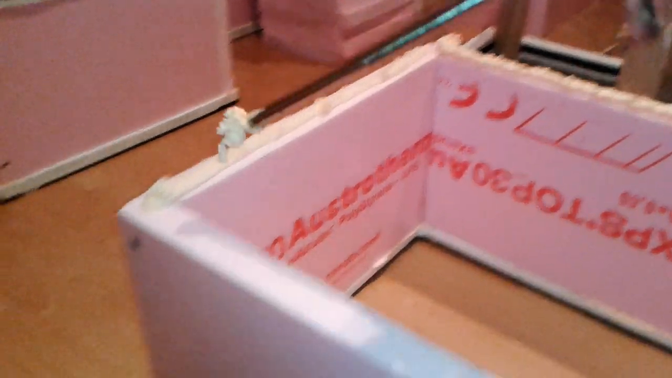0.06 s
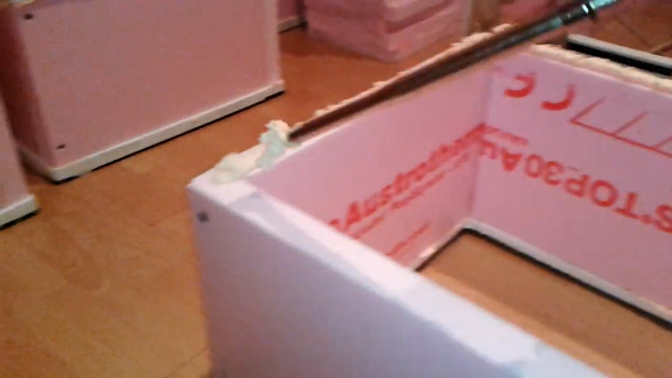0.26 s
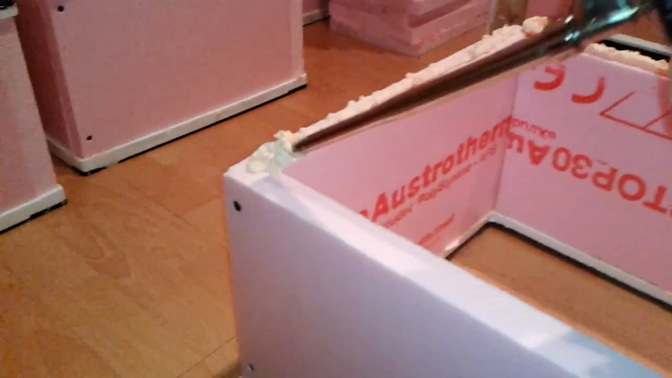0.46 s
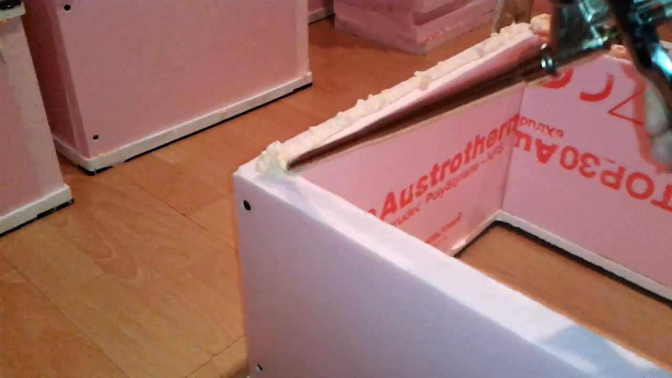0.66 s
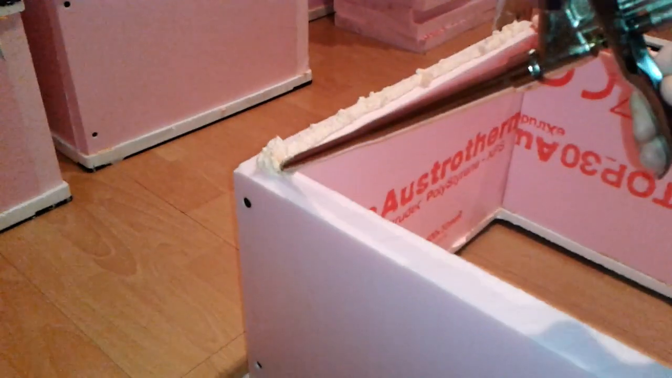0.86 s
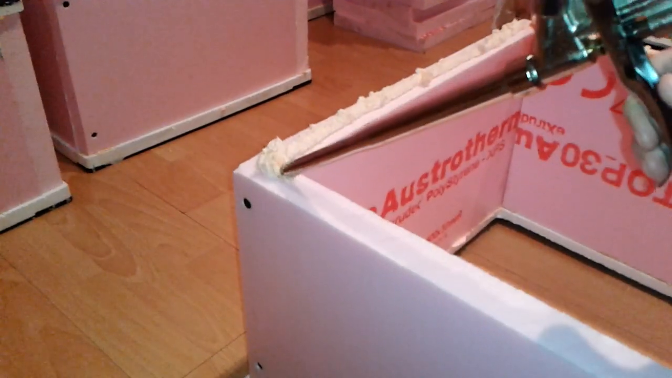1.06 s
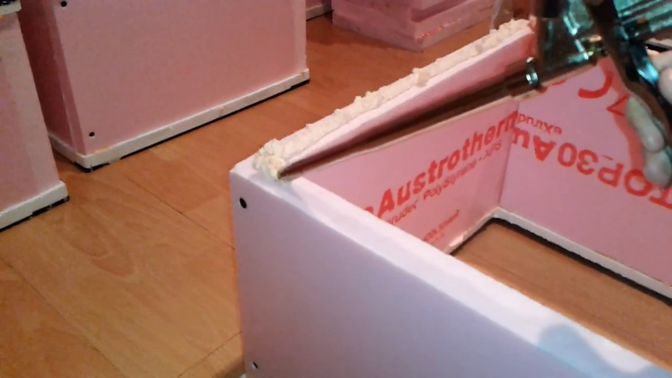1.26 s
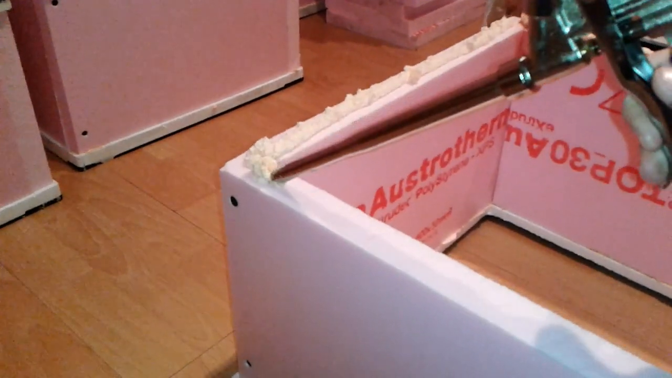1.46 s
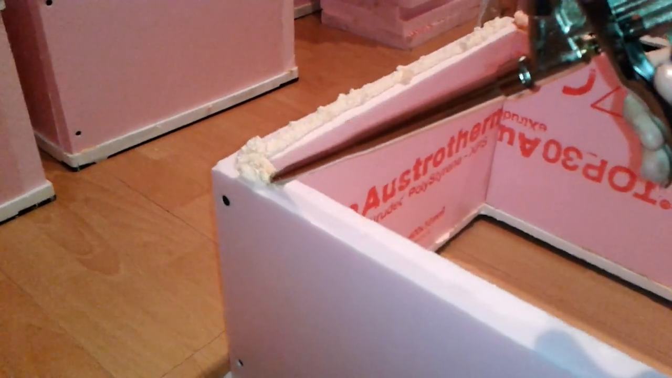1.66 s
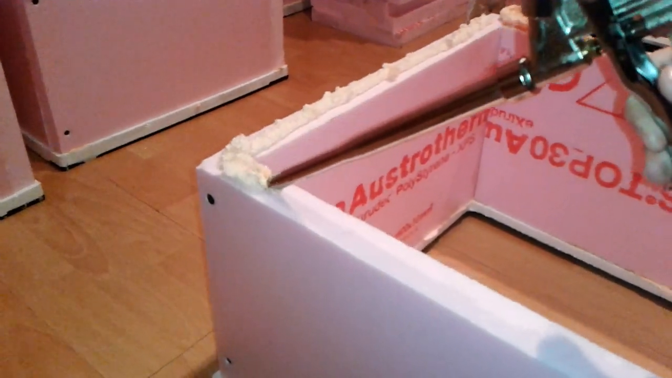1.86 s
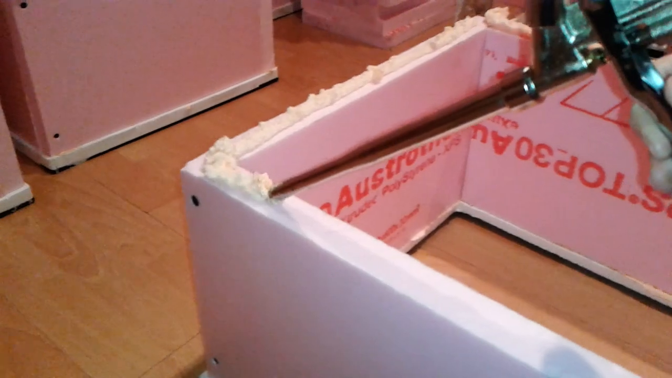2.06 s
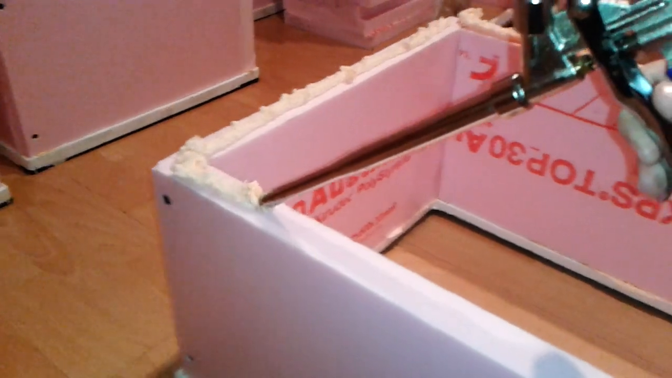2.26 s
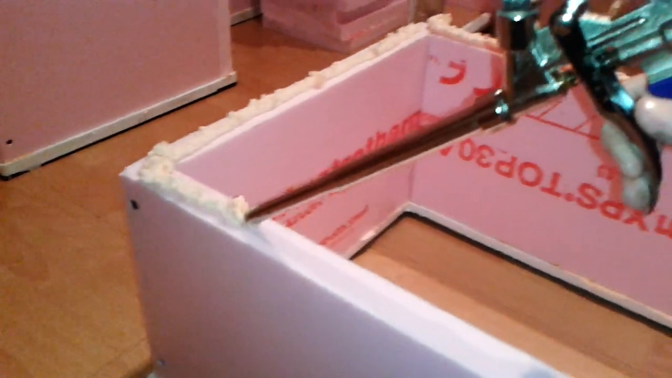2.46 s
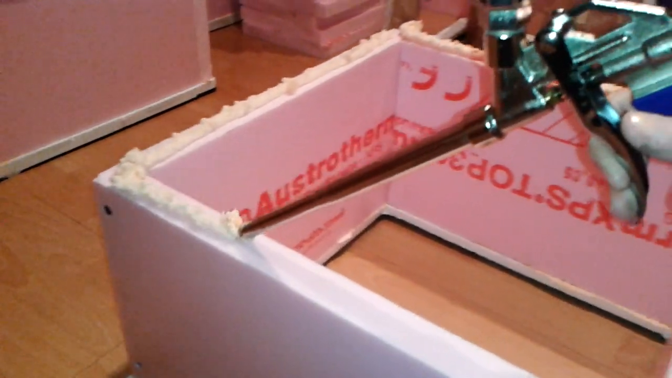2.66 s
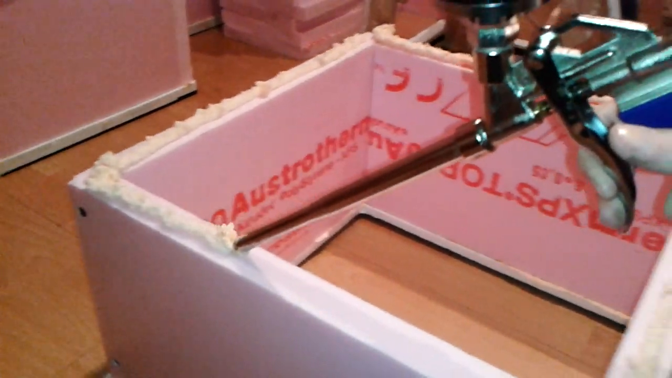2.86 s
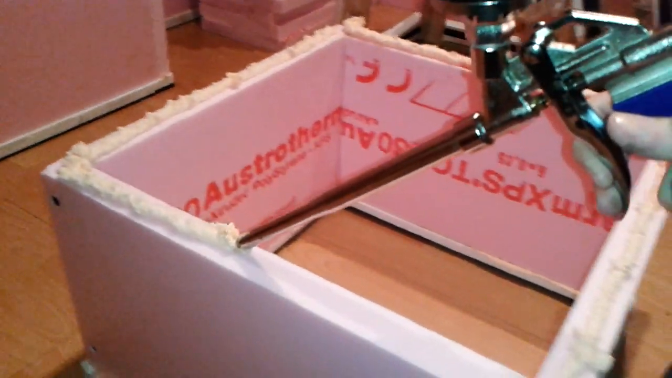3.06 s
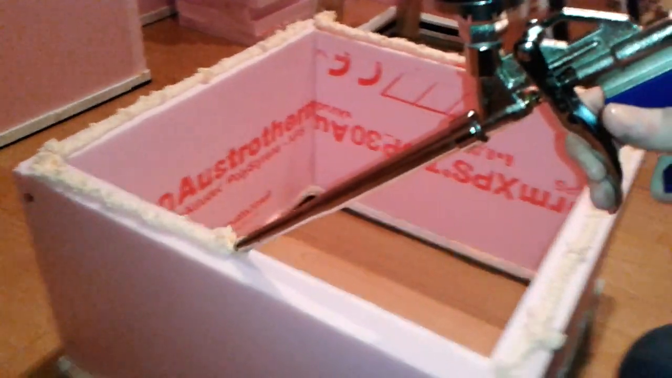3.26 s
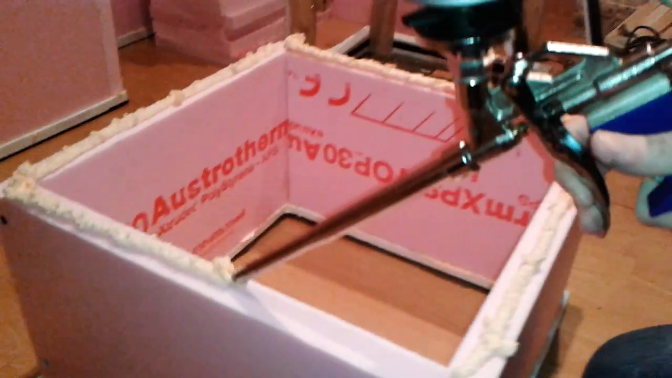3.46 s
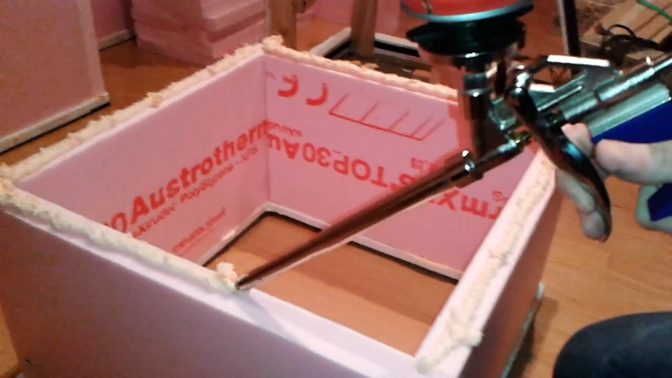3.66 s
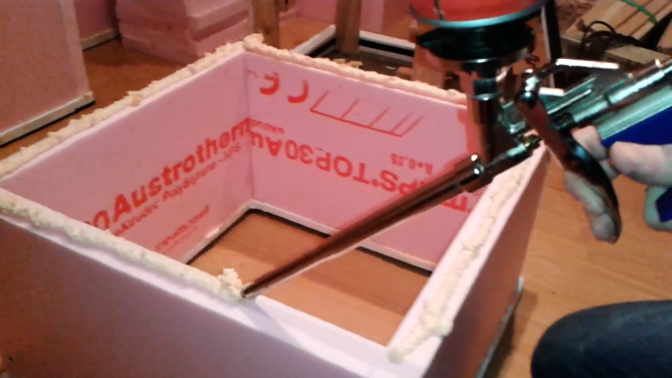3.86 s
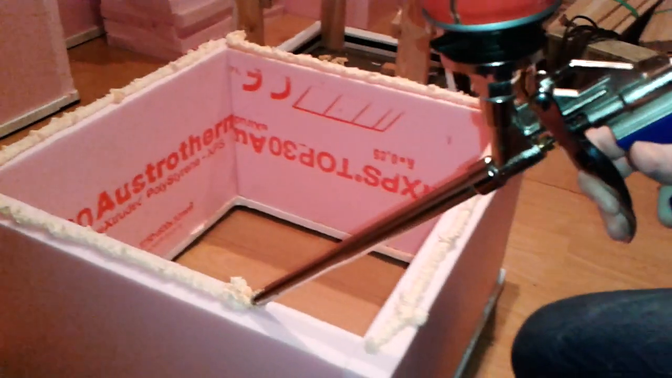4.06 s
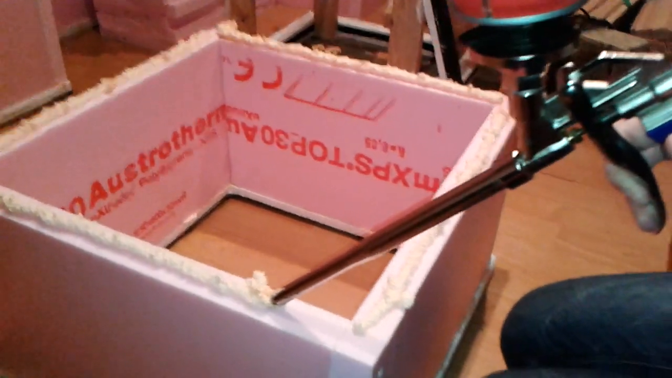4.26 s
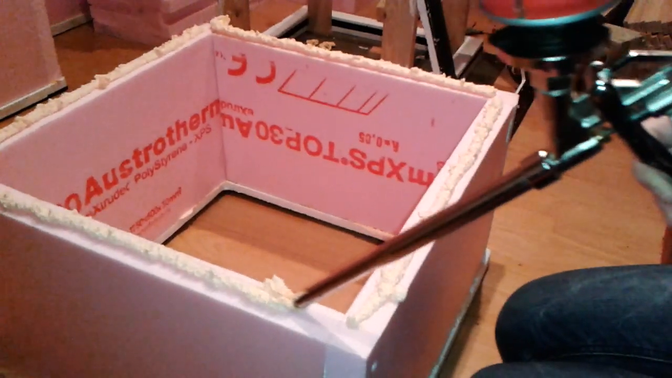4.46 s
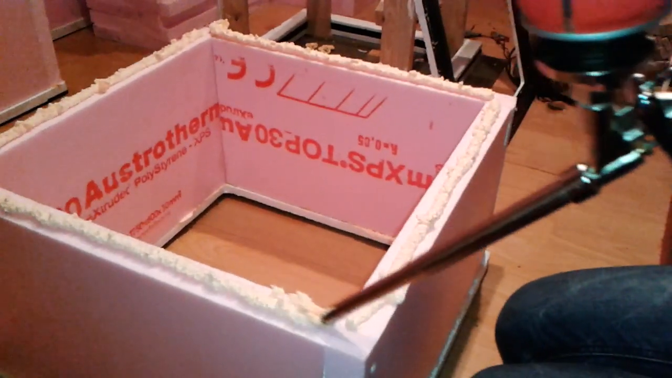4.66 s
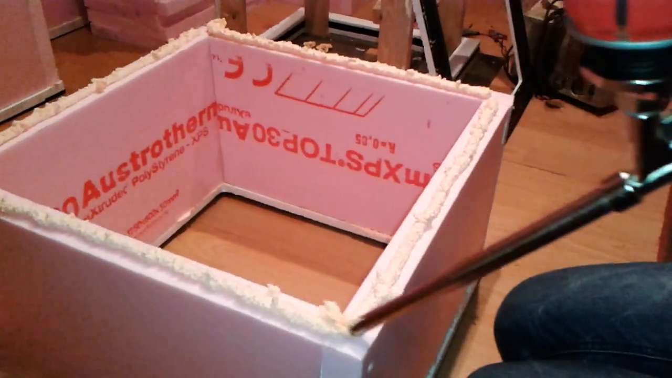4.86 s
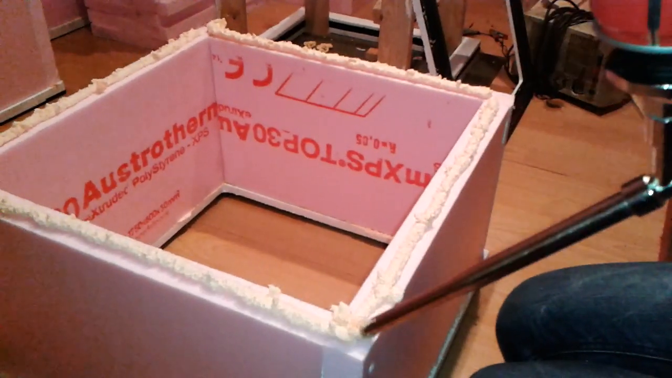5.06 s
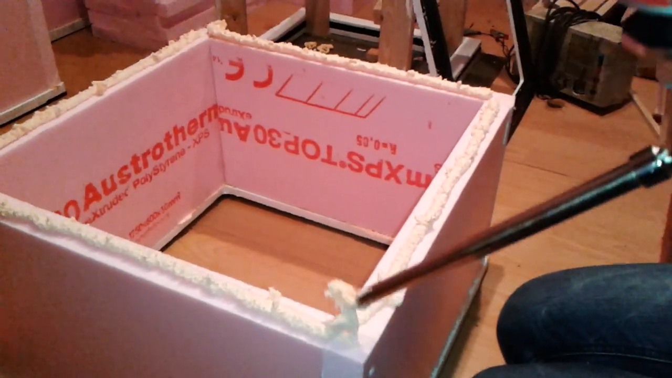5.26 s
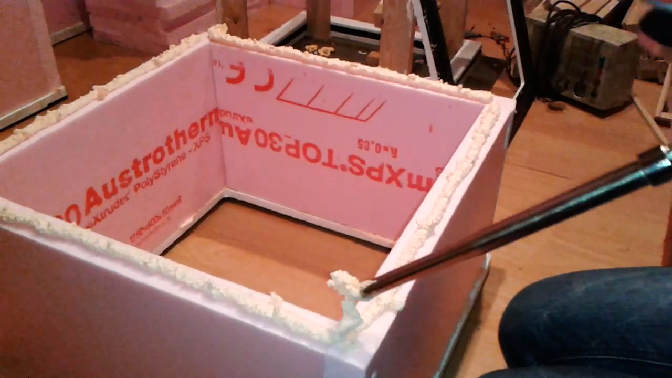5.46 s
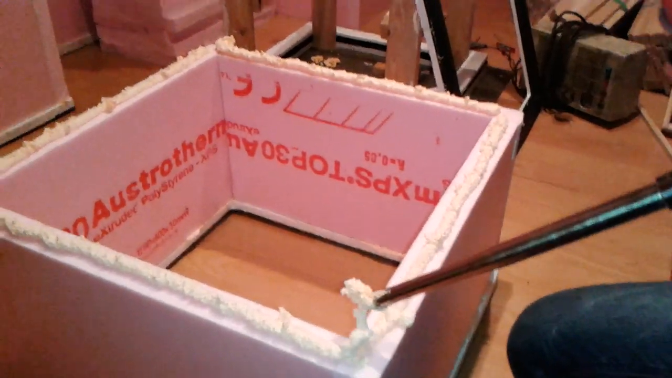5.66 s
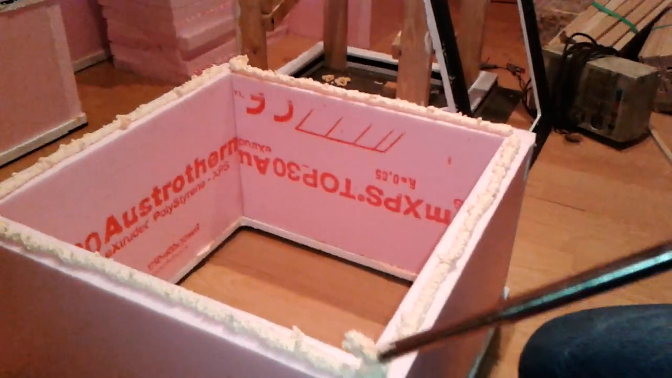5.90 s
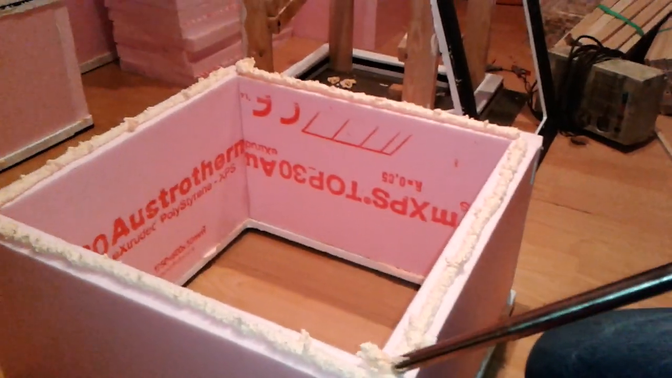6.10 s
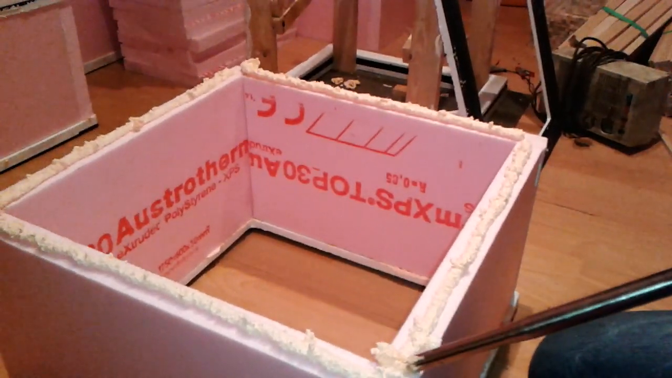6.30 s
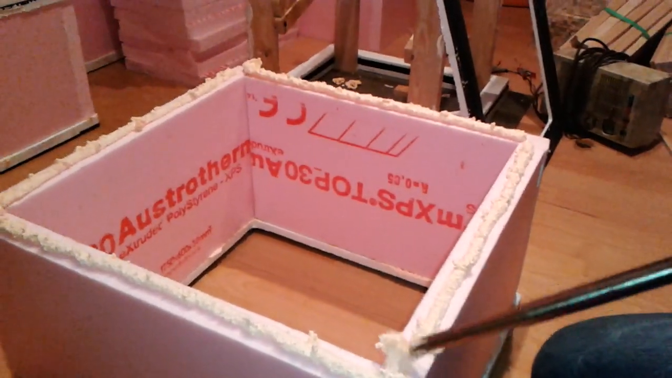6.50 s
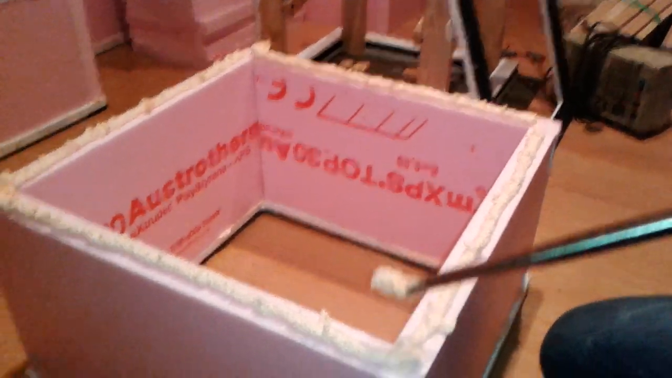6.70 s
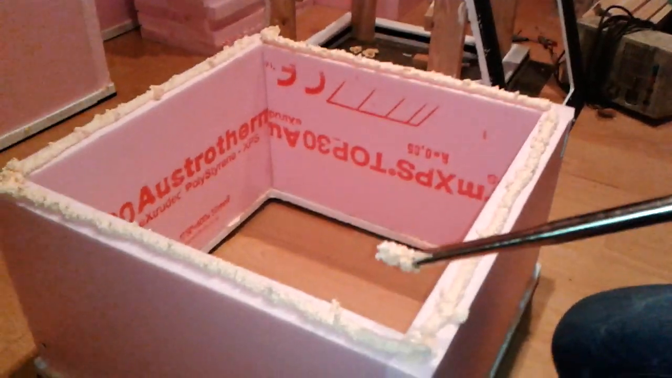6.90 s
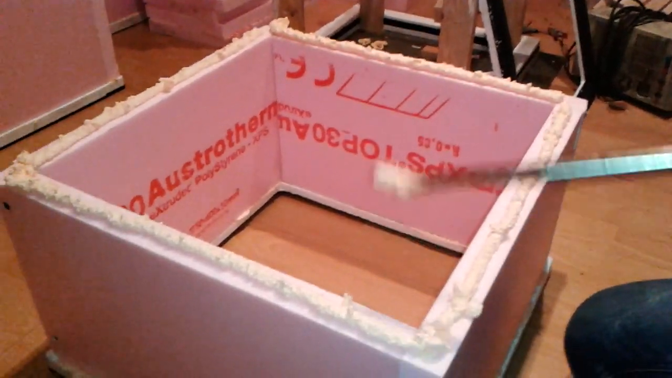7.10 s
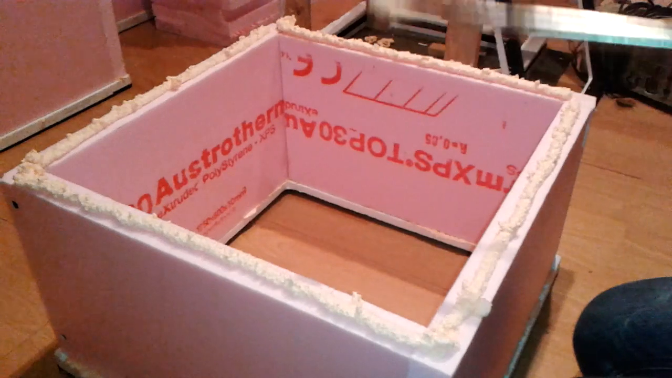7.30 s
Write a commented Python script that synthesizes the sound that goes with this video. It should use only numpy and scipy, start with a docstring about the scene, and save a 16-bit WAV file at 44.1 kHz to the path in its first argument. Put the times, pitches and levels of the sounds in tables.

```python
"""Foam gun in an open foam-board box

Foam adhesive sputters from a hand gun's long nozzle along the box edge: popping, stuttering gas noise
with quick spurts, and a few early pops. Box and floor return drifting echoes and a short tail.
The small recorder is hand-held: skin rustles, ticks ring its case, and a deep rumble comes as it sways.
Beneath lie a steady hiss and a thin, wavering whine that swells with the sound."""
import sys
import numpy as np
from scipy import signal
from scipy.fft import rfft, irfft
from scipy.io import wavfile
from scipy.ndimage import uniform_filter1d

SR = 44100
rng = np.random.default_rng(int(sys.argv[2]) if len(sys.argv) > 2 else 0)


def inscribe(sig):
    """Save sig as 16-bit PCM at rate SR to the path in sys.argv[1].

    A 1-D sig is mono; a 2-D sig holds one channel per row.
    Samples are clipped to [-1, 1] before scaling.
    """
    pcm = np.round(np.clip(np.atleast_2d(sig).T, -1, 1) * 32767)
    wavfile.write(sys.argv[1], SR, pcm.astype(np.int16))


N = 323694
T = np.arange(N) / SR  # seconds

# Skin rustling on the recorder: time_s, level_db
RUSTLE_LEVEL = [(0.0, -60), (0.14, -56.5), (0.31, -62), (0.6, -66), (1.2, -63.5), (5.27, -61),
                (5.48, -61.5), (5.72, -58.5), (5.98, -64.5), (6.3, -66.5), (6.52, -65.5), (6.63, -57.5),
                (6.74, -60.5), (7.34, -60.5)]
# Spectrum of the rustle: frequency_hz, relative_level_db
RUSTLE_SPECTRUM = [(15, -32), (25, -8.5), (344, -2.5), (560, -10.5), (695, -8), (775, -10.5), (936, -10),
                   (6050, -22.5), (14800, -18), (16000, -14.5)]
# Spectrum of the recorder's hiss: frequency_hz, relative_level_db
HISS_SPECTRUM = [(12, -49), (20, 3), (55, -19), (79, -17), (210, 5.5), (301, 1.5), (328, -4.5), (434, -0.5),
                 (558, -3), (642, -11.5), (1400, -13.5), (5380, -17), (8650, -25), (14700, -25),
                 (16000, -11)]
# Ticks of the hand on the case: start_s, peak_db, centre_hz, thump_db (re peak, before its rise)
TICKS = [(0.099, -41, 910, -10), (0.108, -44.5, 657, -16), (0.159, -46, 1300, -12), (0.178, -31, 1230, -7),
         (0.195, -45, 3050, -7), (0.23, -52, 1300, -13), (1.7675, -34.5, 506, -22), (2.763, -27, 590, -19),
         (3.051, -33.5, 346, -16), (3.588, -33, 453, -12), (3.628, -32.5, 520, -20), (4.213, -43, 420, 4),
         (4.291, -43, 350, -7), (5.38, -48.5, 905, -17), (5.4358, -32.5, 1230, -8), (5.582, -48, 800, -16),
         (5.7017, -22, 896, -8.5), (5.7016, -38, 2200, -22), (5.7052, -35, 1010, -19),
         (5.734, -36.5, 590, 1), (5.7472, -42, 406, -6), (5.769, -39.5, 900, 1), (5.793, -45, 800, 0),
         (6.575, -52, 726, 6), (6.5972, -41, 500, 1), (6.6085, -43, 3300, -14), (6.616, -49, 1500, -14),
         (6.6241, -37.5, 1200, -8), (6.6271, -37, 1100, -3), (6.645, -42, 493, -9),
         (6.661, -48.5, 895, -18), (6.677, -49, 900, 2), (6.829, -49, 1000, -20), (6.833, -41.5, 830, -22),
         (6.89, -50, 1400, -13), (6.9728, -33.5, 1080, -26), (6.973, -37, 320, -24),
         (7.014, -44, 1250, -13), (7.064, -52, 1300, -13), (7.091, -36.5, 1100, -12), (7.091, -49, 260, -8),
         (7.118, -50, 397, -17), (7.227, -51, 900, -13), (7.297, -48.5, 387, 1)]
# Ringing modes of the case: pitch_hz, relative_level_db, t60_s
CASE_MODES = [(251, 3.5, 0.014), (437, 4.5, 0.011), (690, 7.5, 0.01), (917, 13.5, 0.0073),
              (1230, 12.5, 0.0045), (2300, 11, 0.0063), (2860, 9, 0.0064), (3700, 2, 0.0042)]
# The trigger opens, holds and closes: time_s, jet_level_db, brightness_db_per_octave
FLOW = [(1.2, -76, -6), (1.25, -68.5, 4), (1.33, -51.5, 3.5), (1.37, -44.5, -3.5), (1.47, -43, 2),
        (1.57, -40.5, -1.5), (1.66, -42, -2.5), (1.9, -40.5, -0.5), (2.3, -38.5, 0), (3.0, -36.5, -3),
        (3.9, -36.5, -1.5), (4.5, -37.5, -2), (4.97, -38.5, -3), (5.05, -44.5, -3), (5.11, -52, 0),
        (5.14, -50, -1.5), (5.18, -46.5, 1), (5.2, -60, 1), (5.25, -68, -5)]
# Strongest spurts at the tip: start_s, level_db, added_brightness_db_per_octave, length_s
SPURTS = [(1.336, -46, -6, 0.006), (1.348, -34, -7, 0.004), (1.365, -39, 2, 0.008),
          (1.377, -34.5, -1, 0.016), (1.41, -35.5, -4, 0.008), (1.432, -33, -4, 0.0061),
          (1.455, -32, -3, 0.0057), (1.468, -33, -5, 0.0068), (1.499, -32.5, -4, 0.014),
          (1.5177, -28.5, -5, 0.008), (1.534, -28, -7, 0.0073), (1.553, -29, -7, 0.0051),
          (1.566, -32, 3.5, 0.0095), (1.582, -33.2, -1, 0.034), (1.641, -31, 6, 0.0047),
          (1.692, -34, 1, 0.015), (1.729, -33, -1.0, 0.008), (1.7446, -31.5, -2, 0.012),
          (1.756, -38, 2, 0.014), (1.799, -33.5, 2.5, 0.0089), (1.883, -35, 1, 0.0072),
          (1.9436, -30, 0.5, 0.0077), (1.968, -33.5, -3, 0.0098), (2.012, -30, 5, 0.0055),
          (2.0536, -30.5, -2, 0.0096), (2.095, -32, 1, 0.011), (2.134, -31.5, 0, 0.0076),
          (2.161, -29, -2, 0.0094), (2.191, -29.5, 2, 0.0069), (2.218, -25.5, 0.5, 0.0095),
          (2.225, -37, -7, 0.0085), (2.295, -27, -5, 0.0068), (2.311, -30.5, 1, 0.0066),
          (2.346, -26.5, 3, 0.0054), (2.359, -29.9, -7, 0.0053), (2.3826, -29.5, -2, 0.012),
          (2.417, -31, -0.5, 0.015), (2.449, -31.5, -2.5, 0.013), (2.493, -29.5, -1.1, 0.0066),
          (2.513, -30.5, 3.5, 0.0082), (2.571, -30.5, 2, 0.011), (2.615, -43, -2, 0.0098),
          (2.636, -41, -1, 0.0085), (2.679, -34, -3, 0.011), (2.725, -45, -1, 0.0069),
          (2.7553, -29, -2, 0.013), (2.788, -30, 2.5, 0.015), (2.835, -29, 1, 0.013),
          (2.871, -28.5, 5.5, 0.0053), (2.917, -29.5, 4.5, 0.014), (2.934, -30, 2, 0.021),
          (2.979, -28.5, 3, 0.0095), (3.01, -28, -1, 0.006), (3.03, -32, 4, 0.0071),
          (3.05, -25, -0.5, 0.0075), (3.069, -27.5, -1, 0.0087), (3.087, -30.5, 1.5, 0.014),
          (3.157, -37, -5, 0.0089), (3.189, -28, 0, 0.007), (3.218, -31, 0, 0.0134),
          (3.299, -30, 6, 0.0076), (3.351, -44, -3, 0.0062), (3.362, -28.5, -1.5, 0.013),
          (3.396, -30.5, -1, 0.011), (3.426, -34, 0, 0.005), (3.474, -34, -4, 0.016),
          (3.518, -28, 1.5, 0.011), (3.565, -32, -8, 0.0096), (3.612, -29, -2, 0.0098),
          (3.662, -28, 0.8, 0.012), (3.69, -29.5, -3, 0.0059), (3.7048, -28.5, -2.2, 0.0073),
          (3.719, -29, -3, 0.0083), (3.752, -28.5, 0, 0.0082), (3.7679, -33, -2, 0.0043),
          (3.7985, -29, 2, 0.0082), (3.828, -28, -1.8, 0.006), (3.84, -24, 0.5, 0.0059),
          (3.9165, -28.5, -1, 0.011), (3.953, -27, -3.2, 0.0054), (3.965, -25, 0.5, 0.0081),
          (4.0074, -27.5, -1, 0.0073), (4.026, -25.5, -2, 0.0032), (4.045, -31.0, -3.1, 0.0081),
          (4.067, -30.5, -6, 0.0045), (4.076, -31, 3, 0.0066), (4.115, -28.5, 2, 0.0054),
          (4.153, -28.5, 2, 0.0086), (4.1702, -28, 0, 0.0082), (4.19, -30, 1, 0.0083),
          (4.2144, -27, -1.3, 0.0074), (4.2366, -29.5, 0, 0.012), (4.283, -29, 0.5, 0.008),
          (4.293, -26, -1, 0.0048), (4.363, -30, 0, 0.018), (4.378, -29, -2, 0.0081),
          (4.448, -32.1, -5, 0.0054), (4.479, -28.5, 0, 0.0054), (4.525, -27.5, 2.5, 0.013),
          (4.564, -32.5, 0, 0.0096), (4.5835, -28.5, 1, 0.014), (4.618, -32, -1, 0.0108),
          (4.662, -30.5, -1.5, 0.011), (4.709, -29.5, -4.5, 0.015), (4.734, -27, -4, 0.0075),
          (4.7604, -26.5, -1, 0.0092), (4.813, -27, -9, 0.0044), (4.849, -32, -0.5, 0.01),
          (4.87, -32, 0, 0.0078), (4.892, -30, -5, 0.007), (4.912, -30, 3, 0.011),
          (4.944, -27.5, 0, 0.0063), (4.953, -32, 2, 0.0083), (4.974, -27.5, 2, 0.0042),
          (5.0304, -31, -1, 0.0091), (5.063, -28.5, -1, 0.0067), (5.107, -30, -4, 0.0052),
          (5.1306, -27, -4, 0.0049), (5.143, -37, -2, 0.0047)]
# Spectrum of the jet before its peaks and tilt: frequency_hz, relative_level_db
JET_SPECTRUM = [(530, -38.5), (900, -16.5), (1360, -10.5), (2140, -4), (2690, -2.5), (2930, -2), (3860, -4),
                (4360, -8), (5550, -10), (7060, -18), (8660, -16), (9650, -20.5), (14200, -31),
                (15200, -57), (16000, -34)]
# Three resonances added to the jet, drifting as the tip travels along the box:
# time_s, low_hz, low_gain_db, middle_hz, middle_gain_db, high_hz, high_gain_db
JET_PEAKS = [(1.33, 1700, -8, 2500, -4, 3660, -2), (1.4, 2030, 7, 2520, 2, 3700, 5.5),
             (1.62, 2050, 4, 2500, 4, 3700, 3), (1.78, 1690, 3, 2400, 0, 3530, -7),
             (1.92, 2590, -6, 3050, 0, 3620, -12), (2.15, 2630, -1, 2990, 5.5, 3350, 1),
             (2.4, 2570, 9.5, 2910, 6, 3190, 3), (2.55, 2240, 6, 2930, 2, 4050, 4),
             (2.7, 2180, 0, 2700, -18, 3330, -4), (2.9, 2200, 1, 2930, 2, 3700, 0),
             (3.05, 2160, -7, 2820, 1, 3960, 2), (3.2, 2380, 2, 3150, -20, 3980, -12),
             (3.4, 2200, -3, 2970, 2, 3700, 3), (3.65, 2430, 1, 2790, 2, 3820, 3),
             (3.95, 2360, 2, 3000, 4.5, 3770, -2), (4.15, 2060, -1, 2910, 0, 3510, 2),
             (4.45, 1920, 1, 2850, -1, 3450, -10), (4.65, 2150, 3, 2870, 5, 3480, -6),
             (5.05, 2060, 8.5, 2900, -2, 4020, -6), (5.13, 2100, -6, 3020, 13, 3700, 7)]
# Spectrum of the low rumble: frequency_hz, relative_level_db
RUMBLE_SPECTRUM = [(80, -16), (200, -8), (400, -5), (650, 0.5), (900, -4), (1300, -3), (2000, -18)]
# Resonance of the rumble, near 880 Hz early, gone midway, near 700 Hz late: time_s, pitch_hz, gain_db
RUMBLE_PEAK = [(1.3, 880, 8), (2.2, 877, 8), (2.7, 900, 5), (3.6, 715, -29), (4.0, 644, -1.5),
               (5.0, 726, -2)]
# Clicks of a few pops as the valve cracks open, with their close echoes: start_s, click_peak_db
POPS = [(1.209, -51), (1.261, -29.5), (1.2627, -32), (1.303, -41), (1.3048, -27), (1.3061, -36.5)]
# Spectrum of a pop: frequency_hz, relative_level_db
POP_SPECTRUM = [(500, -27), (1500, -5.5), (2450, -1), (3500, 5.5), (5000, 0.5), (7500, -7), (12000, -20),
                (16000, -16)]
# Echoes off box and floor as the nozzle travels: start_delay_ms, end_delay_ms, gain (linear, signed)
ECHOES = [(1.48, 2.4, 0.0063), (2.625, 1.624, -0.087), (3.93, 3.2, 0.3), (3.22, 4.9, -0.25),
          (7.7, 9.0, 0.2)]

HISS_DB = -67.5
WHINE_HZ, WAVER_DEPTH_HZ, WAVER_SPEED_HZ = 14968, 24., 60.
WHINE_DB, WHINE_SWELL, QUIET_DB = -76, .24, -66  # swell in dB per dB of loudness above QUIET_DB
SPURT_RISE_S, SPURT_SQUARENESS = 0.0019, 1.83
FLICKER_DB_PER_OCTAVE, FLICKER_HZ = 1.3, 18.
PEAK_WIDTH_HZ, PEAK_FLICKER_DB = 175., 2.5
RUMBLE_DB, RUMBLE_FOLLOW, FULL_FLOW_DB = -48.5, 0.88, -36  # level at full flow; dB per dB of jet level
RUMBLE_PEAK_WIDTH_HZ = 110
PUFF_DB, PUFF_FADE_S = -12, 0.004  # starting level re the click's peak
SWAY_DB, SWAY_HZ, SWAY_START_S, SWAY_END_S = -73, 45.3, 1.9, 3.7
EDGE_HZ = 15740


def amp(db):
    """Decibels to linear gain."""
    return 10 ** (np.asarray(db) / 20)


def evened(x):
    """Scales a signal to rms 1."""
    return x / np.sqrt(np.mean(x ** 2) + 1e-20)


def curve(rows, axis):
    """One column of a table, joined by straight lines at every sample."""
    return np.interp(T, *np.transpose(rows)[[0, axis]])


def coloured(x, points):
    """Minimum-phase filter with a table's spectrum, so nothing sounds ahead of its cause; rms 1."""
    hz, db = np.transpose(points)
    log_hz = np.log(abs(np.fft.fftfreq(4096, 1 / SR)) + 1)
    log_gain = np.log(amp(np.interp(log_hz, np.log(hz), np.maximum(db, -80))))
    taps = np.fft.ifft(np.exp(np.conj(signal.hilbert(log_gain)))).real[:2048]
    return evened(signal.oaconvolve(x, taps)[:len(x)])


def tilted(x, db_per_octave, pivot_hz):
    """Tips the spectrum about a pivot by a slope that changes in time."""
    hz, t, z = signal.stft(x, SR, nperseg=128)
    octaves = np.log2(np.clip(hz, 1500, 12000) / pivot_hz)
    gain_db = octaves[:, None] * np.interp(t, T, db_per_octave)
    return signal.istft(z * amp(gain_db), SR, nperseg=128)[1][:N]


def wander(hz):
    """Slow random drift: noise with its spectrum halved at hz and falling above, rms 1."""
    lowpass = 1 / (1 + (np.fft.rfftfreq(N, 1 / SR) / hz) ** 4)
    return evened(irfft(rfft(rng.standard_normal(N)) * lowpass, N))


def resonate(x, hz, width_hz):
    """Shifts the curve hz down to zero, smooths, and shifts back: a resonance of gain 1."""
    turn = np.exp(2j * np.pi * np.cumsum(hz * np.ones(N)) / SR)
    r = np.exp(-np.pi * width_hz / SR)
    return 2 * (turn * signal.lfilter([1 - r], [1, -r], x / turn)).real


def rustle(creaks_per_s=120, creak_share=0.23):
    """Skin sliding on the case: lumpy noise with tiny random creaks."""
    creaks = rng.standard_normal(N) * (rng.random(N) < creaks_per_s / SR)
    lumps = amp(1.0 * wander(hz=12))
    rub = (1 - creak_share) * rng.standard_normal(N) * lumps + creak_share * evened(creaks)
    return coloured(rub, RUSTLE_SPECTRUM) * amp(curve(RUSTLE_LEVEL, axis=1))


def electronics(sound, follow_s=.15):
    """Recorder noise: steady hiss, and a wavering whine that swells with the loudness of the sound."""
    power = abs(uniform_filter1d(sound ** 2, round(follow_s * SR)))
    loud_db = 10 * np.log10(power + 1e-12)
    whine_db = WHINE_DB + WHINE_SWELL * np.maximum(loud_db - QUIET_DB, 0)
    pitch_hz = WHINE_HZ + WAVER_DEPTH_HZ * wander(hz=WAVER_SPEED_HZ)
    whine = np.sqrt(2) * amp(whine_db) * np.sin(2 * np.pi * np.cumsum(pitch_hz) / SR)
    hiss = amp(HISS_DB) * coloured(rng.standard_normal(N), HISS_SPECTRUM)
    return hiss + whine


def ticks(width_oct=0.89, thump_hz=80, thump_t60=0.027, thump_rise_s=0.0044,
          rise_cycles=0.51, spot_db=-5.1, spot_cycles=5.7):
    """Each tick rings the spot touched, the case modes near its pitch, and pushes the microphone."""
    out, t = np.zeros(N + 4000), np.arange(4000) / SR
    hz, mode_db, t60 = np.transpose(CASE_MODES)[:, :, None]
    detunes = rng.uniform(0.96, 1.04, len(TICKS))
    for (s, db, centre_hz, thump_db), detune in zip(TICKS, detunes):
        near_db = mode_db - 6 * (np.log2(hz / centre_hz) / width_oct) ** 2
        modes = amp(near_db - 60 * t / t60) * np.sin(2 * np.pi * hz * detune * t)
        modes = (modes * (1 - np.exp(-t * hz / rise_cycles)) ** 2).sum(0)
        spot = amp(-60 * t * centre_hz / spot_cycles) * np.sin(2 * np.pi * centre_hz * t)
        spot = spot * (1 - np.exp(-t * centre_hz / rise_cycles)) ** 2
        ring = modes / abs(modes).max() + spot / abs(spot).max() * amp(spot_db)
        thump = amp(thump_db - 60 * t / thump_t60) * np.sin(2 * np.pi * thump_hz * detune * t)
        thump = thump * (1 - np.exp(-t / thump_rise_s))
        out[round(s * SR):][:4000] += amp(db) * (thump - ring / abs(ring).max())
    return out[:N]


def gas(pops_per_s=2400, spread_db=2.0, pop_share=0.58):
    """Turbulent gas as noise, with bursting foam cells as random impulses of either sign."""
    sizes = amp(spread_db * np.minimum(rng.exponential(1, N), 3)) * rng.choice([-1., 1.], N)
    bursts = sizes * (rng.random(N) < pops_per_s / SR)
    return pop_share * evened(bursts) + (1 - pop_share) * rng.standard_normal(N)


def sputter(base_per_s=120, uneven=.5, spread_db=5.0, rise_s=0.0016, fade_s=0.003, steady=0.7):
    """The flow stutters in an uneven beat: sudden openings that close within a few ms."""
    pace = base_per_s * np.exp(uneven * np.clip(wander(hz=69.57), -3, 1))
    beat = np.diff(np.floor(np.cumsum(pace) / SR), prepend=0)
    starts = beat * amp(spread_db * rng.uniform(-0.36, 1, N))
    t = np.arange(2000) / SR
    opening = (1 - np.exp(-t / rise_s)) * np.exp(-t / fade_s)
    return steady + evened(signal.oaconvolve(starts, opening)[:N])


def peaked(x):
    """Lifts drifting, flickering resonances out of the jet, at unchanged short-term loudness."""
    lifted = x.copy()
    for k in (1, 3, 5):
        gain_db = curve(JET_PEAKS, axis=k + 1) + PEAK_FLICKER_DB * wander(hz=15)
        lifted += amp(gain_db) * resonate(x, curve(JET_PEAKS, axis=k), PEAK_WIDTH_HZ)
    before, after = abs(uniform_filter1d(np.array([x, lifted]) ** 2, size=8000)) + 1e-12
    return lifted * np.sqrt(before / after)


def jet(stutter, flow_db, on):
    """Gas noise driven by the stuttering flow; each spurt lifts the drive and tips the brightness."""
    drive = amp(flow_db) * stutter * on
    bright = curve(FLOW, axis=2) + FLICKER_DB_PER_OCTAVE * wander(hz=FLICKER_HZ)
    for s, db, tilt, length in SPURTS:
        t = np.maximum(T - s, 0)
        shape = np.minimum(t / SPURT_RISE_S, 1) * np.exp(-(t / length) ** SPURT_SQUARENESS)
        drive = np.maximum(drive, amp(db) * shape)
        bright = bright + tilt * shape
    return peaked(tilted(coloured(gas(), JET_SPECTRUM) * drive, bright, pivot_hz=3040))


def rumble(stutter, flow_db, on):
    """Low noise following the flow and its stutter, with a resonance that fades out and returns lower."""
    level_db = RUMBLE_DB + RUMBLE_FOLLOW * (flow_db - FULL_FLOW_DB)
    noise = rng.standard_normal(N) * (3.7 + stutter)
    low = coloured(noise, RUMBLE_SPECTRUM) * amp(level_db) * on
    peak = resonate(low, curve(RUMBLE_PEAK, axis=1), RUMBLE_PEAK_WIDTH_HZ)
    return low + amp(curve(RUMBLE_PEAK, axis=2)) * peak


def pops():
    """A sharp click and a short, fading puff of gas for each row: the early pops and close echoes."""
    t, out = np.arange(2048) / SR, np.zeros(N)
    click = coloured(1. * (t == 0), POP_SPECTRUM)
    click = click / abs(click).max()
    for s, db in POPS:
        noise = coloured(rng.standard_normal(2048), POP_SPECTRUM)
        puff = amp(PUFF_DB) * np.exp(-t / PUFF_FADE_S) * noise
        out[round(s * SR):][:2048] += amp(db) * (click + puff)
    return out


def box(x, tail_db=-12, t60=0.22, turns_per_s=1.5):
    """Early echoes whose delays drift, then a short diffuse tail that changes as the tip moves."""
    travel = np.clip((T - FLOW[0][0]) / (FLOW[-1][0] - FLOW[0][0]), 0, 1)
    early = x.copy()
    for start_ms, end_ms, gain in ECHOES:
        delay_s = (start_ms + (end_ms - start_ms) * travel) / 1000
        early += gain * np.interp(T - delay_s, T, x)
    early = early / np.sqrt(1 + sum(gain ** 2 for *_, gain in ECHOES))
    t = np.arange(SR // 3) / SR
    tails = rng.standard_normal((3, len(t))) * amp(-60 * t / t60) * (t > .005)
    tails = tails / np.linalg.norm(tails[0])
    # the sound passes round three different tails, at steady total power
    shares = np.sqrt(2 / 3) * np.cos(2 * np.pi * (turns_per_s * T + np.arange(3)[:, None] / 3))
    tail = signal.oaconvolve(x * shares, tails, axes=1)[:, :N].sum(0)
    return early + amp(tail_db) * tail


def nozzle():
    """Jet and pops heard through the box, with the rumble direct; one stutter drives jet and rumble."""
    on = (T > FLOW[0][0]) & (T < FLOW[-1][0])
    stutter, flow_db = evened(sputter()), curve(FLOW, axis=1)
    return box(jet(stutter, flow_db, on) + pops()) + rumble(stutter, flow_db, on)


def sway():
    """Deep, lumpy rumble of the hand-held microphone while the gun is moved along."""
    moving = uniform_filter1d(1. * (T > SWAY_START_S) * (T < SWAY_END_S), 4000)
    return amp(SWAY_DB + 1.7 * wander(hz=5)) * wander(hz=SWAY_HZ) * moving


def scene():
    """Everything at the recorder, with its own electronics responding to the sum."""
    sound = rustle() + ticks() + nozzle() + sway()
    return (sound + electronics(sound))[None]


def record(dry):
    """Steep low-pass at the upper band limit."""
    lowpass = signal.firwin(1023, EDGE_HZ, window=("kaiser", 9), fs=SR)
    return signal.oaconvolve(dry, lowpass[None], "same")


dry = scene()
out = record(dry)
inscribe(out)
```